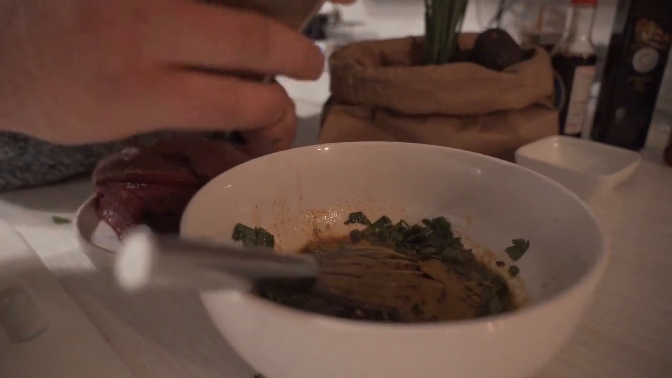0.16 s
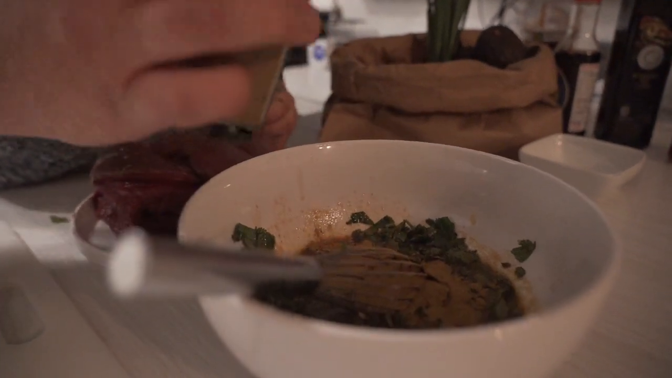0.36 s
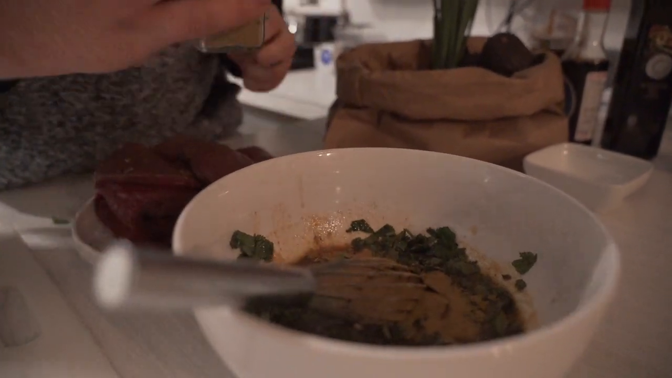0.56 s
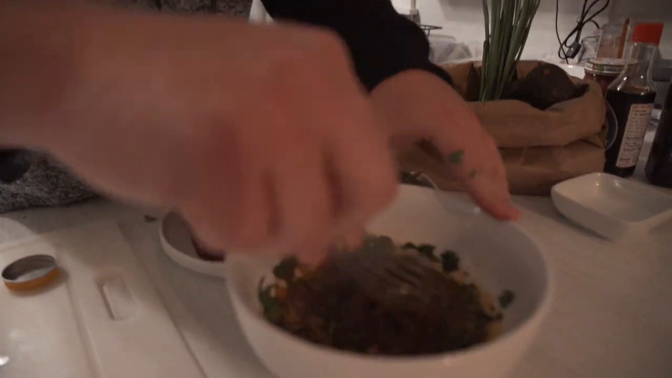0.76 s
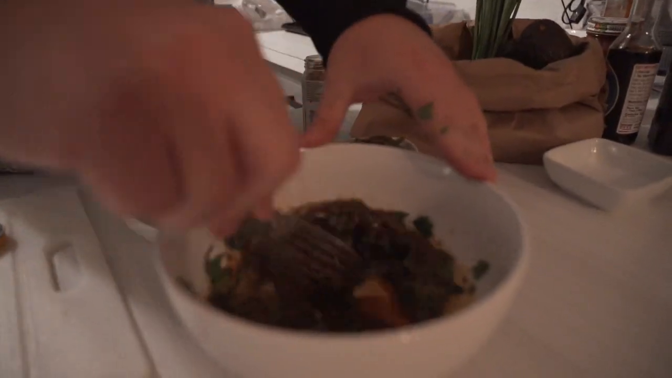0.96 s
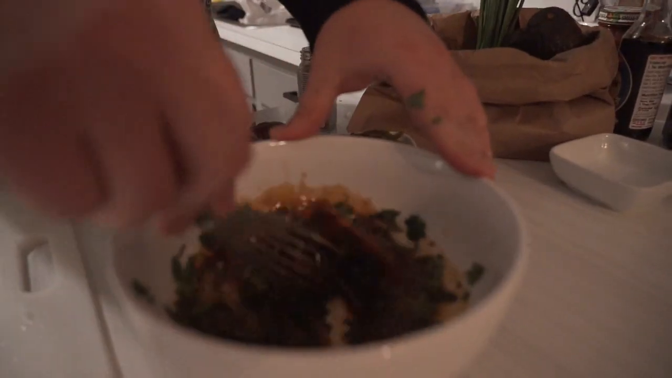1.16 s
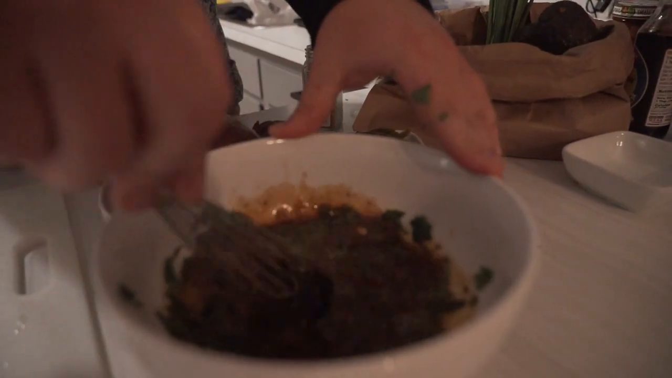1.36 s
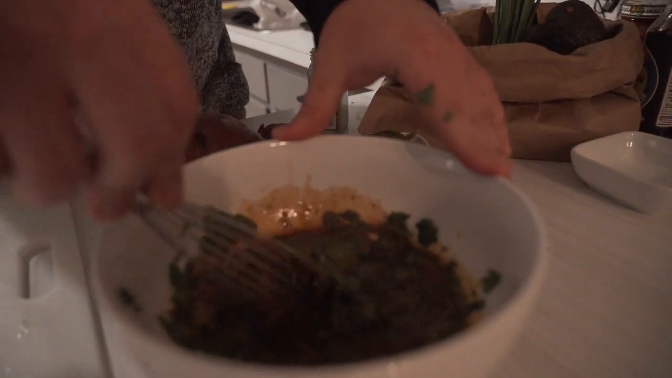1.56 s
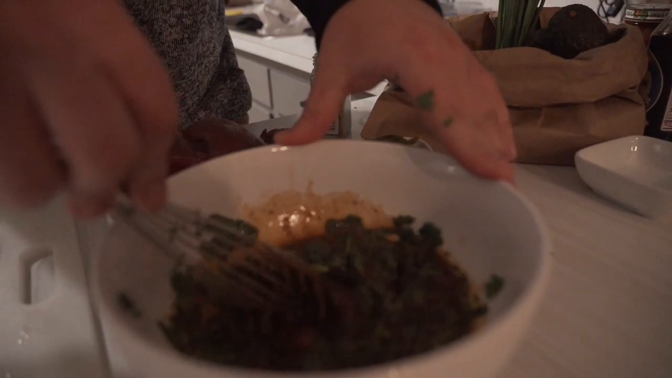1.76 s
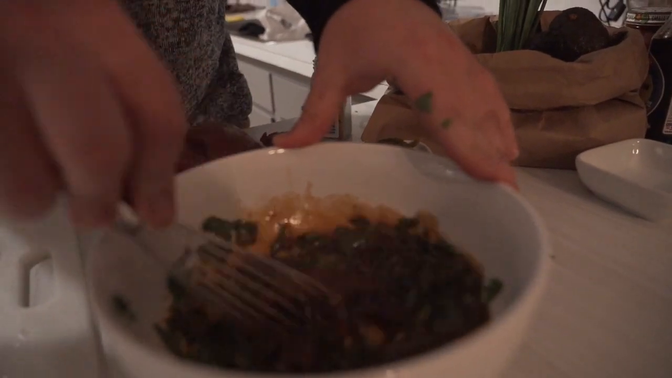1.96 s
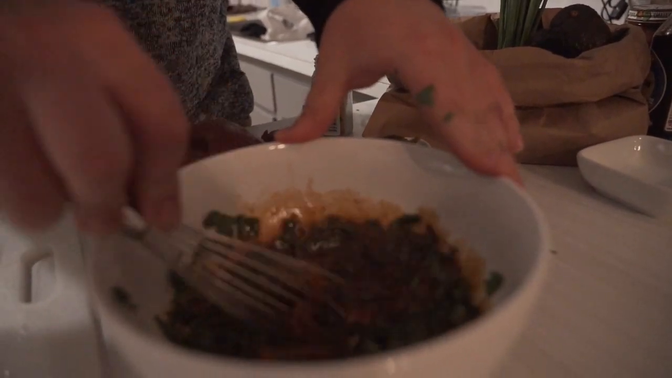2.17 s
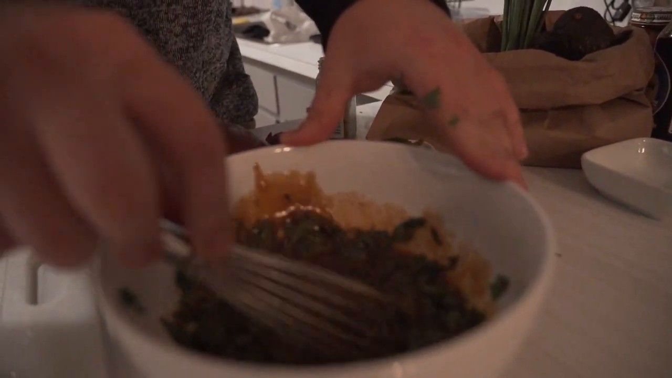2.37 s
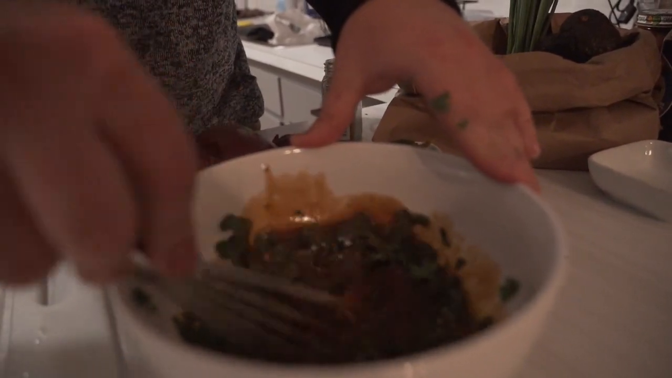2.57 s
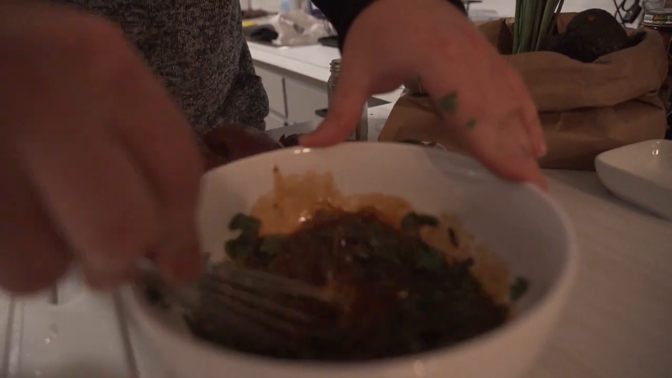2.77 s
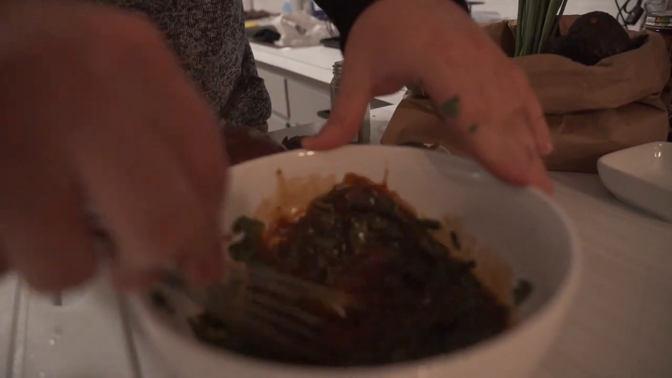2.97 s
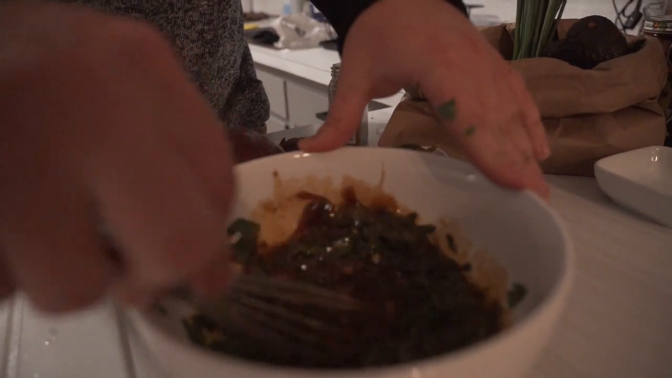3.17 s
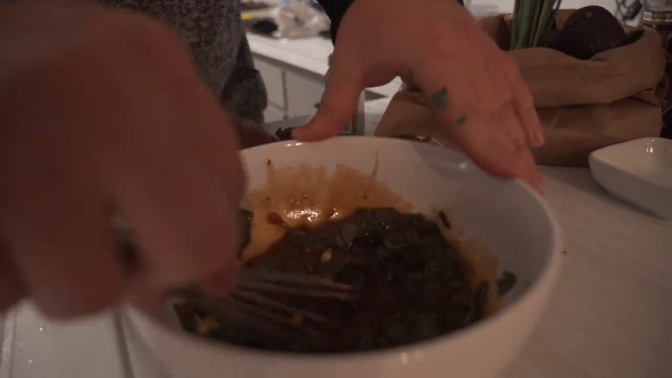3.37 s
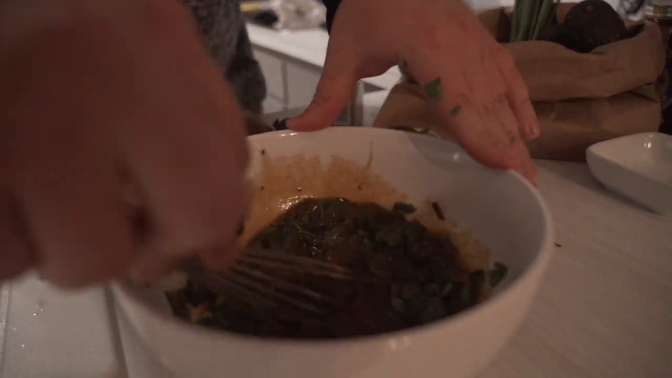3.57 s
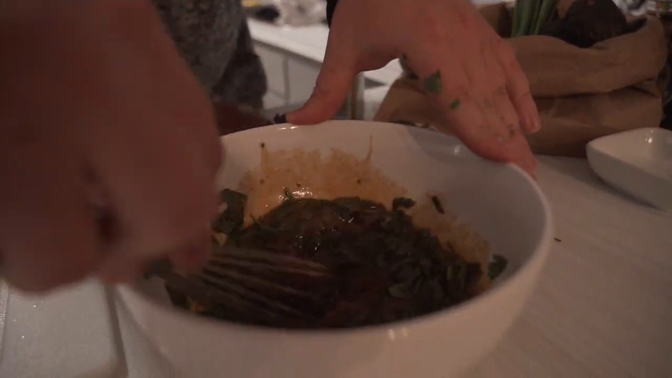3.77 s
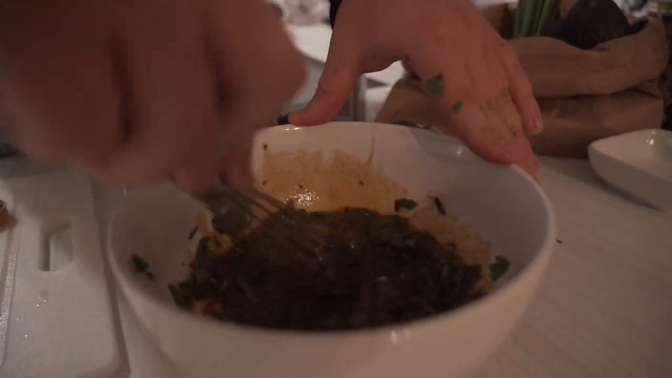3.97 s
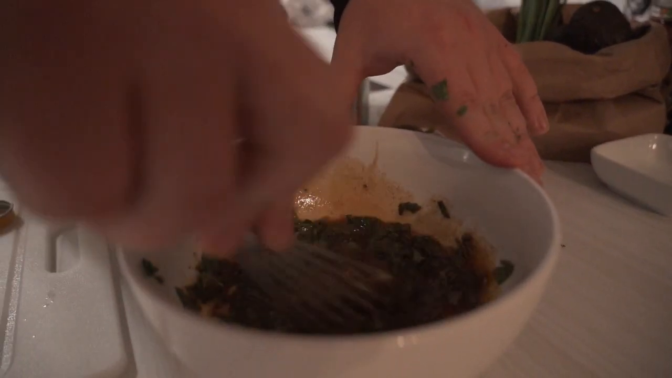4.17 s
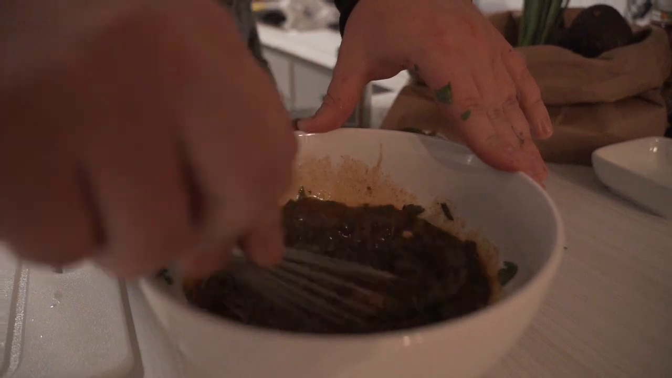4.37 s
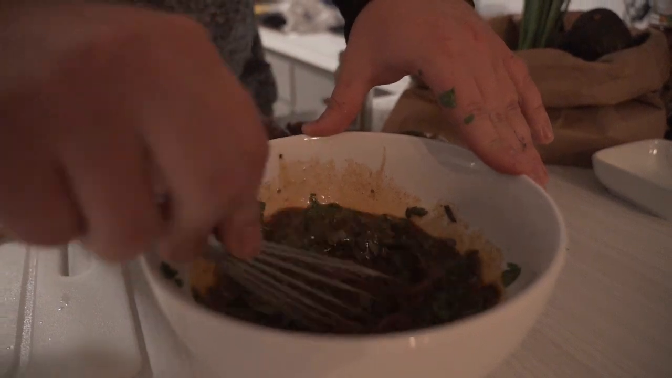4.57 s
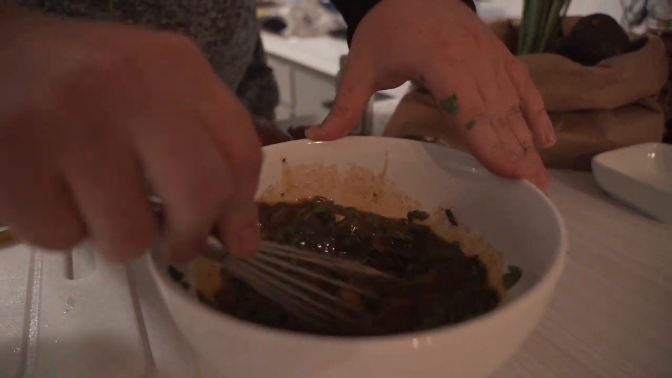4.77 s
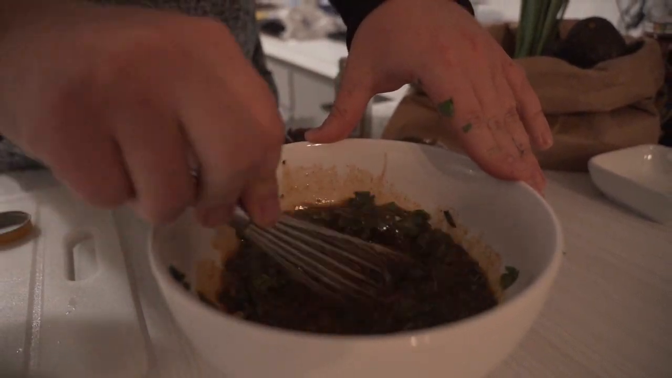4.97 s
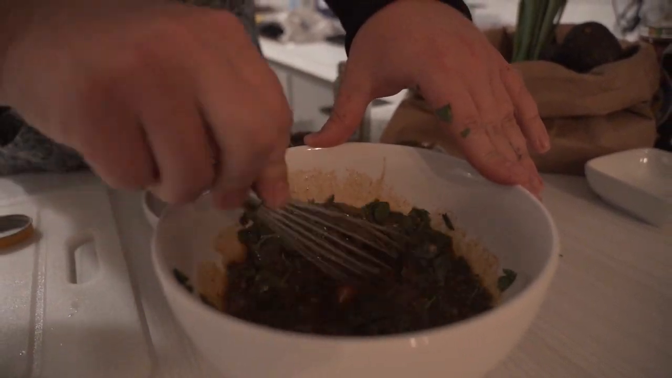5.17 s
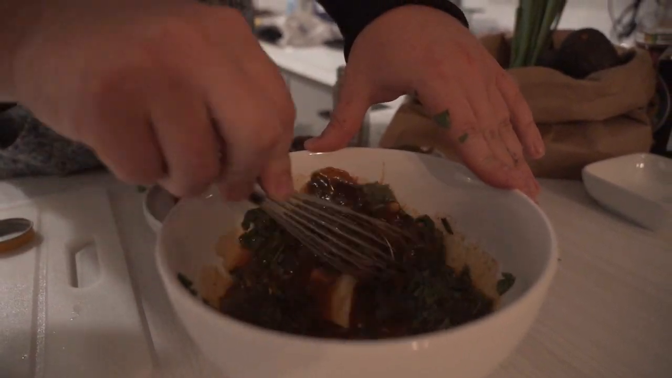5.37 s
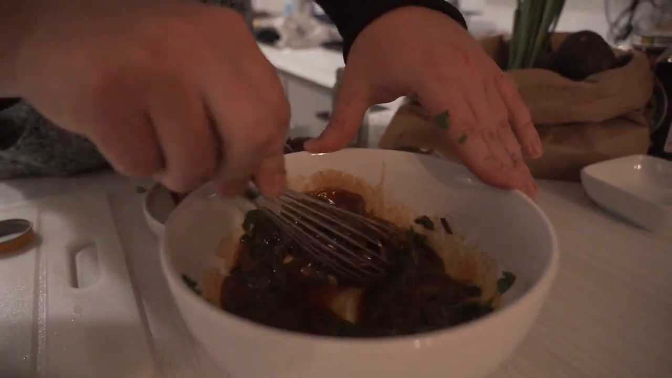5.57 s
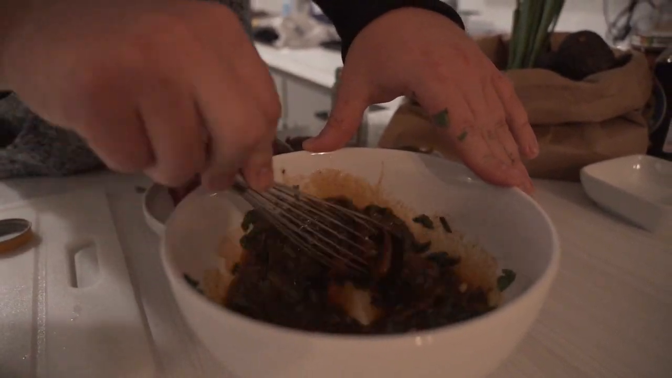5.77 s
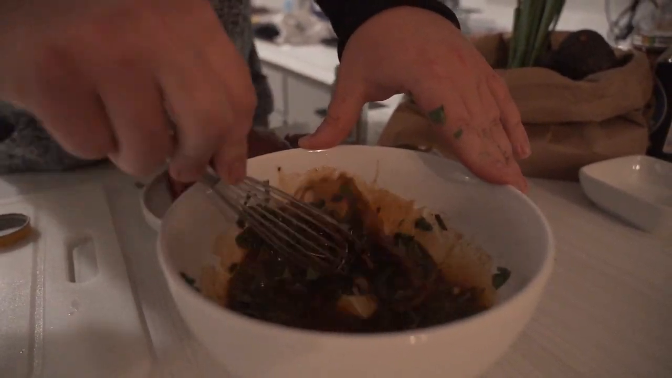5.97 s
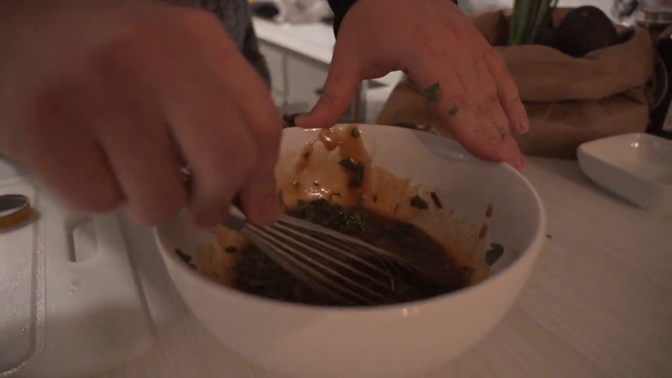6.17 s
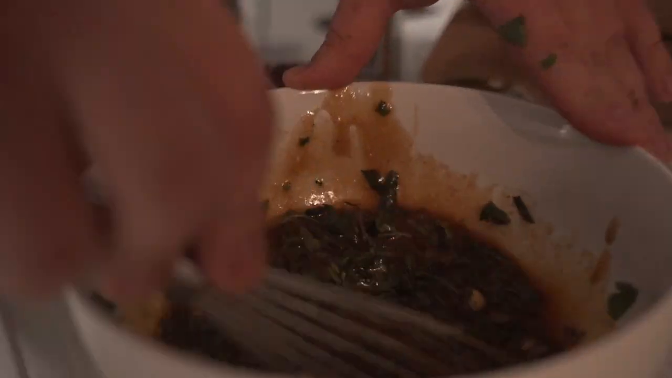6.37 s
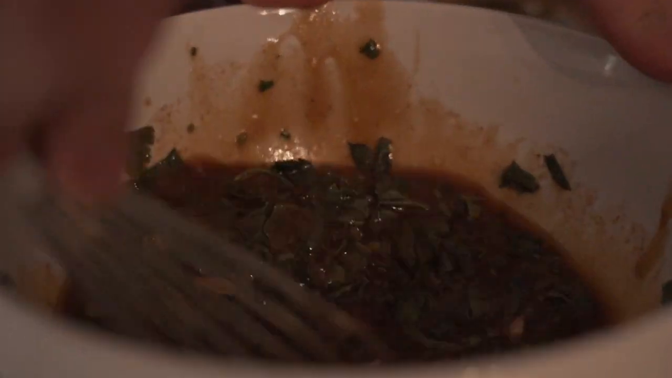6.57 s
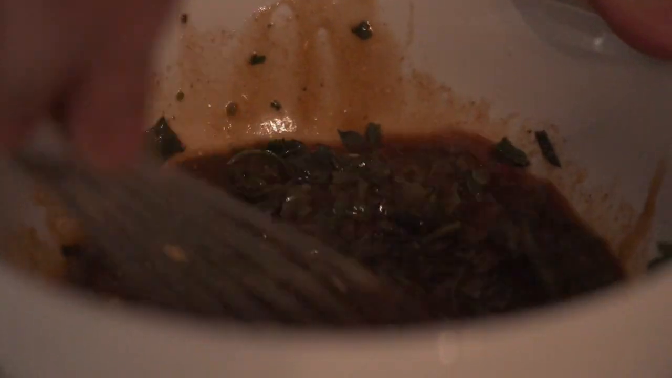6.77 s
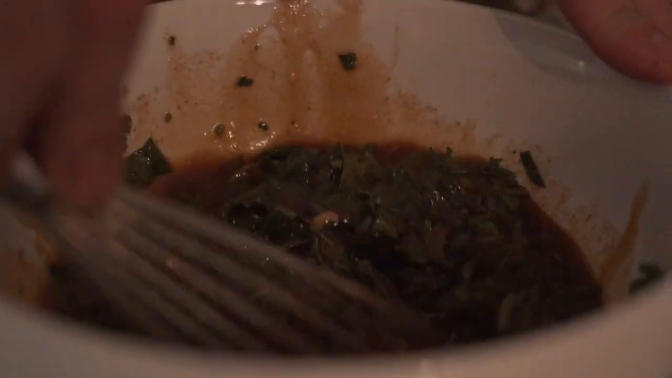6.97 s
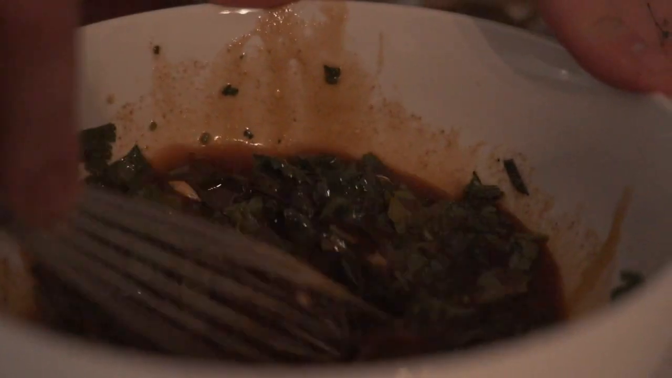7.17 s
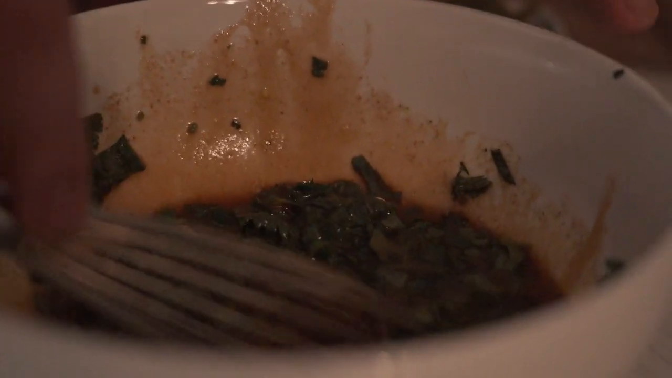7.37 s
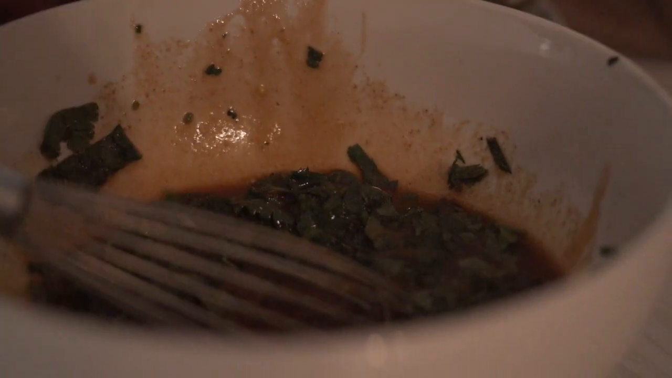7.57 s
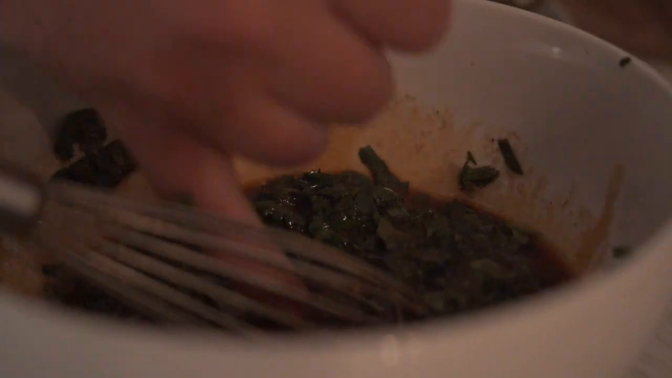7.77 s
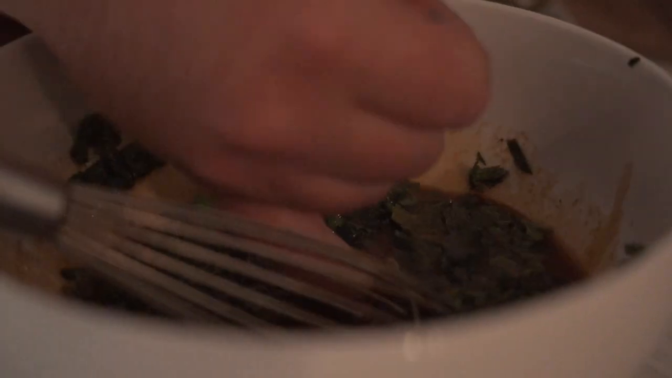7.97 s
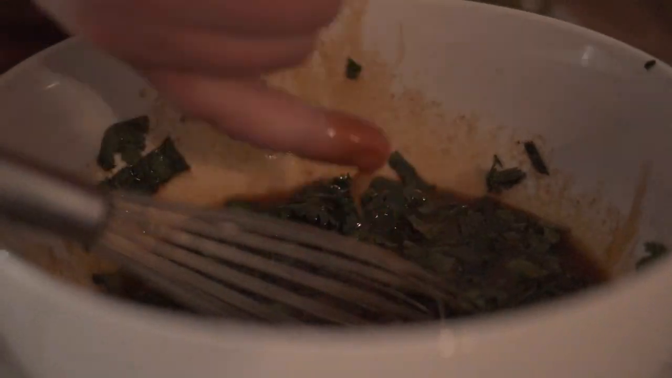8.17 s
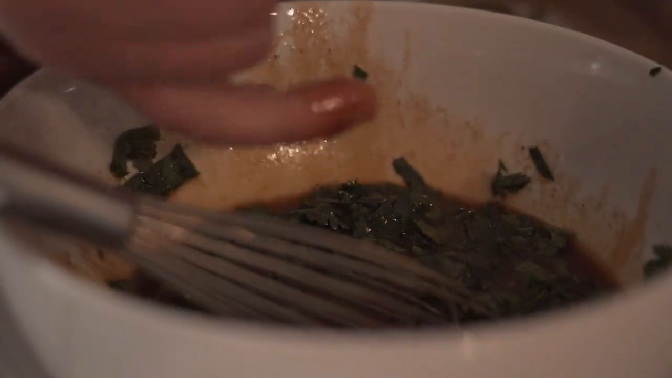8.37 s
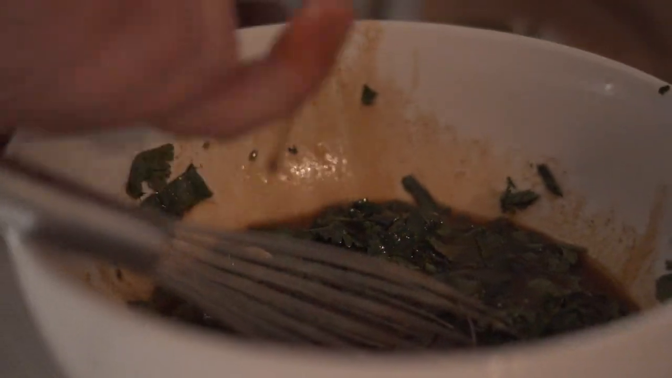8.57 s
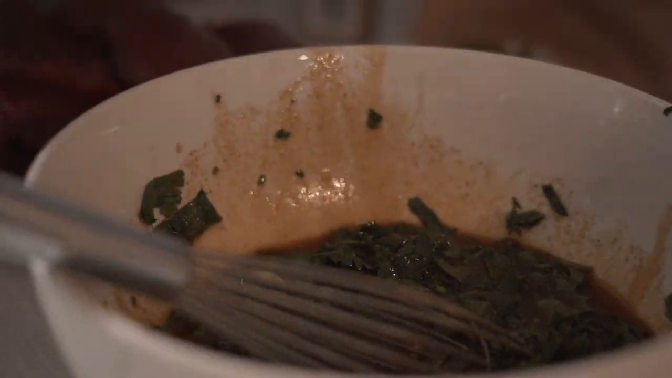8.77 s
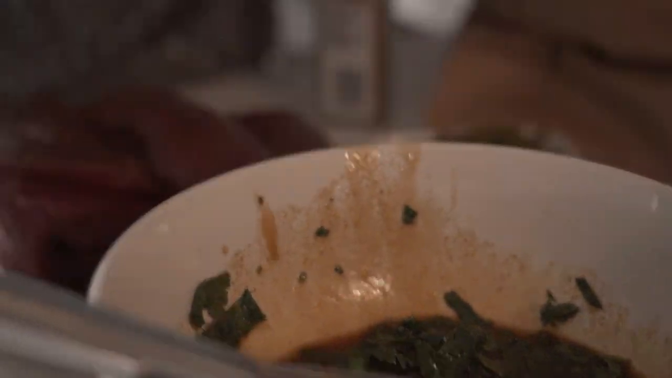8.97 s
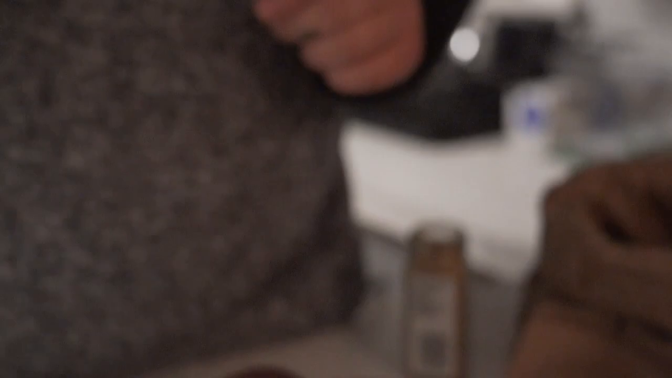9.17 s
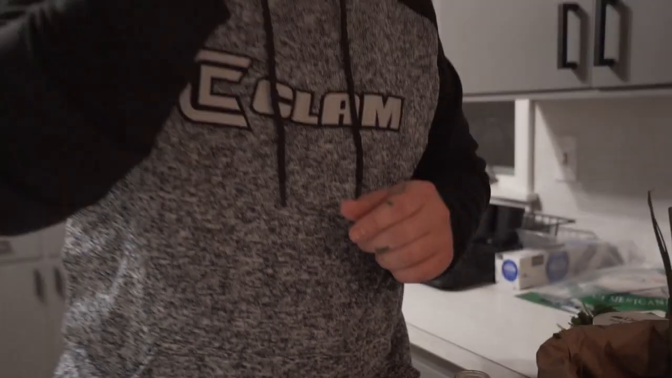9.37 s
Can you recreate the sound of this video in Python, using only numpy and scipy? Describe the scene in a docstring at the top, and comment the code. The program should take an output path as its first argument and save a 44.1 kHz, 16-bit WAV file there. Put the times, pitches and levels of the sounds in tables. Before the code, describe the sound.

Close to a ceramic bowl in a small, mildly reverberant kitchen, a whisk works through thick sauce in quick uneven strokes. Low rubbing comes with the early strokes, then sticky squelches, tiny pops and rhythmic dull bowl knocks. A few hard, bright clinks stand out. Stirring thins after six seconds, ends with a clink, and leaves quiet room tone with soft shuffles and taps.

```python
"""On a kitchen counter, close to a ceramic bowl, a wire whisk stirs a thick herb marinade.
Bursts of filtered clicks make the wet swish of each stroke; resonators excited by uneven slips make its rub.
Air pockets pop as rising tones, wire films snap, slow bubbles swell; decaying modes make the bowl's thuds
and the clinks of the steel handle. Diffuse kitchen echo surrounds them.
A motor hum of a few harmonics and coloured noise lie underneath, louder at first."""
import sys
import numpy as np
from scipy import signal
from scipy.fft import rfft, irfft, next_fast_len
from scipy.io import wavfile
from scipy.ndimage import uniform_filter1d

SR = 44100
rng = np.random.default_rng(int(sys.argv[2]) if len(sys.argv) > 2 else 0)


def dump_mix(stems):
    """Bounce the given channels to the path in sys.argv[1] as a 16-bit WAV at rate SR."""
    frames = np.atleast_2d(stems).T  # one column per channel
    limited = np.clip(frames, -1, 1)  # hard clip at full scale
    pcm = np.round(limited * 32767).astype(np.int16)
    wavfile.write(sys.argv[1], SR, pcm)


N = 415863
T = np.arange(N) / SR


def from_db(db):
    """Decibels to gain."""
    return 10 ** (np.asarray(db) / 20)


def rms_one(x):
    """Scale to rms 1."""
    return x / np.sqrt(np.mean(x ** 2) + 1e-20)


def at_hz(points, hz, column=1):
    """Read a column of a spectrum on a log-frequency axis."""
    points = np.array(points)
    return np.interp(np.log(hz + 1e-9), np.log(points[:, 0]), points[:, column])


def coloured(x, spectrum):
    """Give x a spectrum; rms 1."""
    size = next_fast_len(N)
    gain = from_db(at_hz(spectrum, np.arange(size // 2 + 1) * SR / size))
    return rms_one(irfft(rfft(x, size) * gain, size)[:N])


def band(x, low_hz, high_hz):
    """Butterworth band-pass."""
    edges = [low_hz, min(high_hz, .45 * SR)]
    return signal.sosfilt(signal.butter(2, edges, "band", fs=SR, output="sos"), x + 1e-18)


def resonance(x, hz, width_hz):
    """Two-pole resonance with gain 1 on top."""
    r = np.exp(-np.pi * width_hz / SR)
    zeros = np.array([1, 0, -1]) * (1 - r * r) / 2
    poles = [1, -2 * r * np.cos(2 * np.pi * hz / SR), r * r]
    return signal.lfilter(zeros, poles, x + 1e-18)


def mode(hz, db, t60):
    """Half a second of a struck mode, a sine that dies exponentially."""
    t = T[:SR // 2]
    return from_db(db - 60 * t / t60) * np.sin(2 * np.pi * hz * t)


def burst(db, low_hz, high_hz, t60):
    """A short spray of countless quickly damped modes, as dying band noise."""
    t = T[:SR // 2]
    return from_db(db - 60 * t / t60) * rms_one(band(rng.standard_normal(len(t)), low_hz, high_hz))


def add(out, s, sound):
    """Mix a sound in at time s."""
    i = max(int(s * SR), 0)
    out[i:i + len(sound)] += sound[:max(N - i, 0)]


def drift(rate):
    """Smooth random wandering, rate turns a second, rms 1."""
    count = 2000
    knots = rng.standard_normal(count)
    return rms_one(np.interp(T * rate, np.arange(count), knots))


def swells(rows, edge_db, rise_share):
    """Gain that climbs to each crest and sinks again, edge_db down at both ends."""
    gain = np.zeros(N)
    for crest, length, db in rows:
        near = np.abs(T - crest) < 1.5 * length
        before = (crest - T[near]) / rise_share
        after = (T[near] - crest) / (1 - rise_share)
        away = np.maximum(before, after) / length
        gain[near] = np.hypot(gain[near], from_db(db - edge_db * away ** 1.53))
    return gain


def spell(start, end, ramp_s=0.01):
    """Gain 1 between two times, with short ramps."""
    return np.clip(np.minimum(T - start, end - T) / ramp_s + .5, 0, 1)


# motor hum: multiple of HUM_HZ, level_db [relative]
HUM_HARMONICS = [(1, 1.5), (2, -14), (3, -11), (4, -16.5)]
HUM_HZ = 57.7
HUM_DB, LOUD_HUM_DB, LOUD_HUM_END_S = -69.5, -54, 0.747  # the hum starts louder, then drops
# low murmur of the room: pitch_hz, level_db [relative, per Hz]
RUMBLE_SPECTRUM = [(20, -9.5), (45, -9), (90, -12.5), (200, -8), (330, -15.5), (470, -14.5), (700, -24),
                   (1300, -29), (2500, -48.5)]
# soft shuffling near the bowl: crest_s, length_s, level_db [rms at the crest]
SHUFFLES = [(6.02, 0.11, -61), (6.33, 0.25, -56.5), (9.2, 0.31, -62), (9.4, 0.26, -61)]
# colour of the shuffling: pitch_hz, level_db [relative, per Hz]
SHUFFLE_SPECTRUM = [(25, -3.5), (80, -3.5), (250, -9), (550, -20), (1100, -27.5), (4000, -29.5),
                    (9000, -51.5)]
# colour of the hiss: pitch_hz, level_db [relative, per Hz]
HISS_SPECTRUM = [(150, -8), (500, -2.5), (900, -0.5), (1200, -2), (2200, 2.2), (2850, -3), (3600, 2.5),
                 (4200, 3), (4600, -5), (5800, -14.5), (9000, -23), (16000, -25)]
# spells of louder hiss: start_s, end_s, level_db [rms at the middle]
HISS_SPELLS = [(-.1, 0.727, -64.5), (6.252, 7.699, -75.5)]
HISS_DB, HISS_SAG_DB_PER_S = -83, 6  # steady level; each spell sinks slowly


def background(rumble_db=-70, loud_rumble_db=-62, air_db=-90):
    """Around the bowl: hum as summed harmonics; murmur, shuffling, hiss and thin air as noise."""
    white = rng.standard_normal((4, N))
    early = spell(-1, LOUD_HUM_END_S)
    hum = 0
    for k, db in HUM_HARMONICS:
        hum = hum + from_db(db) * np.sin(2 * np.pi * (round(k) * HUM_HZ * T + rng.random()))
    hum = rms_one(hum) * from_db(HUM_DB + early * (LOUD_HUM_DB - HUM_DB))
    rumble_level = from_db(rumble_db + early * (loud_rumble_db - rumble_db))
    rumble = rumble_level * coloured(white[0], RUMBLE_SPECTRUM)
    shuffle = swells(SHUFFLES, edge_db=12.5, rise_share=0.38) * coloured(white[1], SHUFFLE_SPECTRUM)
    louder = 0
    for start, end, db in HISS_SPELLS:
        sag_db = HISS_SAG_DB_PER_S * (T - (start + end) / 2)
        louder = louder + spell(start, end) * from_db(db - sag_db)
    hiss = np.hypot(from_db(HISS_DB), louder) * coloured(white[2], HISS_SPECTRUM)
    return hum + rumble + shuffle + hiss + from_db(air_db) * white[3]


def grains(per_s, spread_db):
    """Random clicks, many small and a few large."""
    size = from_db(spread_db * np.minimum(rng.exponential(1, N), 4.5))
    return (rng.random(N) < per_s / SR) * size * rng.choice([-1, 1], N)


# colour of the wet crackle: pitch_hz, level_db [relative, per Hz]
WET_SPECTRUM = [(750, -5), (1000, -10), (1450, -4), (2400, -6.5), (3600, -2.5), (4600, -9.5), (5700, -14.5),
                (7200, -11.5), (10000, -20), (15500, -22.5)]


def wet_crackle(per_s, spread_db, cycles, patchy_db):
    """Tiny bubbles and tearing films; cavities open and close between the leaves, so each pitch comes and goes."""
    clicks = grains(per_s, spread_db)
    pitches = np.geomspace(750, 15000, 36)
    dealt = rng.choice(len(pitches), N, p=pitches / pitches.sum())  # small bubbles are the common ones
    out = 0
    for k, hz in enumerate(pitches):
        bubbles = rms_one(resonance(clicks * (dealt == k), hz, hz / cycles))
        patches_db = patchy_db * np.clip(drift(rate=55), -2, 1.7)
        out = out + from_db(at_hz(WET_SPECTRUM, hz) + patches_db) * np.sqrt(hz) * bubbles
    return rms_one(out)


def blip(hz, length, rise):
    """An opening air pocket swells and fades while its pitch climbs; its ragged rim makes the tone rough."""
    age = T[:SR // 20] / (0.77 * length)  # 1 at the peak, where the pitch is hz
    pitch = hz * (1 + 2 * rise * np.tanh((age - 1) / 2))
    ragged = 1 + .25 * rms_one(uniform_filter1d(rng.standard_normal(len(age)), size=36))
    return (age * np.exp(1 - age)) ** 3 * ragged * np.sin(2 * np.pi * np.cumsum(pitch) / SR)


def squelch(wetness, per_s=170, level_db=0.5, centre_hz=2600):
    """Small air pockets of every size open wherever the sauce is disturbed."""
    out = np.zeros(N)
    times = np.cumsum(rng.exponential(1, size=2500)) / per_s
    times = times[times < T[-1]]
    chances = np.clip(rng.standard_normal((len(times), 4)), -1.8, 1.8)
    for s, (size, loud, slow, glide) in zip(times, chances):
        strength = wetness[int(s * SR)] * from_db(level_db + 1.7 * loud)
        length = .0022 * np.exp(.3 * size + .35 * slow)
        rise = .02 + .05 * glide
        add(out, s, strength * blip(centre_hz * np.exp(-.5 * size), length, rise))
    return out


# how stirred up the sauce is: time_s, level_db [before the mix of the crackle]
SEEP = [(.72, -86), (.9, -73.5), (1.25, -72.5), (2.2, -65.5), (2.6, -67.5), (3.75, -60.5), (4.17, -78.5),
        (4.6, -64), (5.85, -66), (6.2, -77), (7.1, -73.5), (7.5, -92.5)]
# strokes of the whisk: crest_s, length_s, swish_db [through the leaves], rub_db [on the wall]
STROKES = [(.885, .05, -61.5, -52.5), (1.015, 0.033, -57, -63), (1.378, .125, -54.5, -41),
           (1.582, 0.085, -54, -46.5), (1.765, 0.15, -60.5, -71), (1.821, 0.088, -61, -45),
           (1.894, 0.028, -57, -64), (2.002, .08, -54, -66), (2.053, 0.072, -47, -43),
           (2.13, 0.075, -59.5, -59), (2.68, 0.064, -60, -53.5), (2.9, 0.23, -61.5, -77),
           (3.1, 0.17, -61.5, -60), (3.295, 0.15, -54, -54.5), (3.41, 0.12, -56, -52.5),
           (3.515, 0.19, -57, -57.5), (3.69, 0.22, -52.5, -52), (3.875, 0.16, -52, -47),
           (4.11, 0.034, -60.5, -76), (4.335, 0.087, -59.5, -65), (4.495, 0.13, -52, -45),
           (4.725, 0.17, -59, -53), (5.118, 0.08, -51, -48.5), (5.305, 0.049, -49, -78),
           (5.735, 0.038, -64, -74), (5.825, 0.1, -53, -71), (6.705, .09, -63, -71)]
STROKE_RISE_SHARE, STROKE_EDGE_DB = 0.53, 18.5  # part of a stroke before its crest; how far down its ends lie


def stirred_db(s):
    """Level of the stirred-up sauce at time s, read between the listed points."""
    return np.interp(s, *np.transpose(SEEP))


def sauce(churn_db=0.0, flutter_db=5.0, spatter_db=-9):
    """Dense crackle under each sweep, sparse as the sauce settles, with squelches, spatter and a low thick churn."""
    sweep = swells([row[:3] for row in STROKES], STROKE_EDGE_DB, STROKE_RISE_SHARE)
    seep = from_db(stirred_db(T))
    wetness = np.hypot(0.39 * sweep, seep)
    flutter = from_db(flutter_db * np.clip(drift(rate=100), -2, 1.5))  # wire after wire cuts through
    dense = sweep * flutter * wet_crackle(per_s=7600, spread_db=3.5, cycles=24, patchy_db=6.5)
    sparse = seep * wet_crackle(per_s=1100, spread_db=4.0, cycles=24, patchy_db=3.5)
    droplets = rms_one(band(grains(per_s=42, spread_db=5.0), 5500, 19000))  # single droplets land
    spatter = from_db(spatter_db) * wetness * droplets
    churn = from_db(churn_db) * seep * rms_one(band(rng.standard_normal(N), 70, 210))
    return from_db(-0.5) * (dense + sparse) + squelch(wetness) + spatter + churn


STIR_START_S, STIR_END_S = .8, 7.15  # smaller pops and snaps come at random while the whisk is in the sauce
STRAY_FOLLOWS = 0.35  # share of the sauce's swing in dB that they follow


def strays(per_s, db, centre_hz, spread_db, octaves):
    """Rows (s, dB, Hz) of small chance events, louder where the sauce is more stirred up."""
    count = 200
    when, loud, size = rng.uniform(-1, 1, (count, 3)).T
    s = STIR_START_S + (np.arange(count) + 1 + when) / per_s
    below_top_db = stirred_db(s) - np.max(np.array(SEEP)[:, 1])
    levels_db = db + STRAY_FOLLOWS * below_top_db + spread_db * loud
    rows = np.transpose([s, levels_db, centre_hz * 2 ** (octaves * size)])
    return list(rows[s < STIR_END_S])


# the largest air pockets open in the sauce: time_s, level_db [before level_db of pops], pitch_hz
POPS = [(0.623, -44, 3100), (1.008, -40, 1620), (1.013, -39, 1870), (1.025, -33, 1536),
        (1.202, -39.5, 1740), (1.236, -40.5, 3600), (1.561, -43.5, 1830), (1.831, -40, 1550),
        (2.289, -38.5, 1940), (2.301, -33, 1830), (2.433, -44.5, 2820), (3.535, -37, 1430),
        (4.329, -39, 1770), (4.471, -39.5, 3800), (5.202, -43, 1550), (5.377, -33.5, 1720),
        (5.725, -45, 3850), (5.858, -38.5, 1480), (5.908, -41, 2360), (6.047, -42.5, 1700),
        (6.498, -50, 3040), (6.698, -51, 3200), (7.772, -52.5, 1310)]
POP_S = 0.0028  # typical length; the peak comes at 0.77 of it


def pops(level_db=-4.5, rise=.11, tear_db=-13, length_spread=.3):
    """The larger air pockets tear open: a rising tone with a tiny crack of noise."""
    out = np.zeros(N)
    small = strays(per_s=7.1, db=-49.5, centre_hz=2555, spread_db=6, octaves=0.58)
    for s, db, hz in list(POPS) + small:
        length = POP_S * np.exp(length_spread * rng.uniform(-1.1, 1))
        add(out, s - 0.85 * length, from_db(db + level_db) * blip(hz, length, rise))
        add(out, s - 0.35 * length, burst(db + tear_db, low_hz=1213, high_hz=7000, t60=0.016))
    return out


# resonances of the wire loops: pitch_hz, width_hz, level_db [relative]
WIRES = [(112, 57, 1.5), (166, 43, 0.5), (390, 68, -18), (731, 55, -5.5), (1006, 200, -16), (1403, 80, -13),
         (1870, 93, -31), (2724, 90, -18.5)]
RUB_SHARE, RUB_LAG_S = 0.47, .005  # part of a stroke spent against the wall, centred just after the crest


def rubs(slips_per_s=900, edge_s=0.015, flex=0.076, slide=.06, level_db=-3.5):
    """Uneven slips on the glaze ring the wire loops; they bend anew each stroke and their pitch slides."""
    out = np.zeros(N)
    slips = grains(slips_per_s, spread_db=3.5)
    bent = np.cumsum(slide * drift(rate=35))  # samples by which the ringing runs ahead
    bends = rng.standard_normal((len(STROKES), len(WIRES)))
    for (crest, length, _, db), bend in zip(STROKES, bends):
        start, end = crest + RUB_LAG_S + RUB_SHARE * length * np.array([-.5, .5])
        near = (T > start - .05) & (T < end + .05)
        steps = np.arange(near.sum())
        pressure = np.clip(np.minimum(T[near] - start, end - T[near]) / edge_s + .3, 0, 1)
        for (hz, width, mode_db), b in zip(WIRES, bend):
            hz = hz * (1 + flex * b)
            ring = slips[near]
            for _ in range(2):  # two passes at 1.55 times the width give about the listed width
                ring = resonance(ring, hz, 1.55 * width)
            ring = np.interp(steps + bent[near] - bent[near][0], steps, ring)
            even = ring / np.sqrt(uniform_filter1d(ring ** 2, size=1100) + 1e-18)
            out[near] += from_db(db + mode_db + level_db) * pressure * even
    return out


# the loudest films snap between the wires: time_s, level_db [before ring and spray levels], pitch_hz
SNAPS = [(1.007, -48, 8100), (1.416, -41, 6560), (1.891, -45, 5700), (1.983, -41, 5460),
         (2.045, -33.5, 5700), (2.056, -39, 5540), (3.546, -34.5, 7900), (4.376, -45.5, 9200),
         (5.816, -44, 7300), (7.829, -60, 14300)]


def snaps(ring_db=7, ring_cycles=24, spray_db=-7, build_s=0.00031):
    """Films snap between the wires, ring for a few cycles and throw a fine spray."""
    out = np.zeros(N)
    small = strays(per_s=7, db=-49.5, centre_hz=8150, spread_db=6.5, octaves=.6)
    for s, db, hz in list(SNAPS) + small:
        ring = mode(hz, ring_db, ring_cycles / hz)
        snap = ring + burst(spray_db, low_hz=5000, high_hz=16000, t60=0.022)
        add(out, s, from_db(db) * snap * (1 - np.exp(-T[:len(snap)] / build_s)))
    return out


# the bowl rocks on the counter: time_s, level_db [before level_db of knocks]
KNOCKS = [(2.083, -33), (2.303, -40.5), (2.784, -32.5), (2.983, -33.5), (3.175, -37), (3.371, -41.5),
          (3.589, -35), (3.779, -40), (4.323, -47), (4.727, -38.5), (4.828, -34.5), (4.938, -40),
          (5.153, -39), (5.380, -33.5), (5.579, -36), (5.796, -38), (7.216, -37)]
# bowl and counter together: pitch_hz, level_db [relative], t60_s; each knock varies all three
COUNTER_MODES = [(139, -16, 0.07), (185.7, -7, 0.067), (251, -3, 0.11), (303.4, -5.5, 0.14),
                 (407, -3, 0.057), (738, -7.5, 0.029), (1210, -8.5, 0.011)]


def knocks(level_db=-2.5, vary_db=3.0, detune=0.02):
    """The bowl's foot drops back on the counter with a dull thud; grip and sauce shift its pitch and damping."""
    out = np.zeros(N)
    chances = rng.standard_normal((len(KNOCKS), len(COUNTER_MODES), 2))
    for (s, db), chance in zip(KNOCKS, chances):
        grip = rng.uniform(-1, 1)
        pitch, damping = 1 + .02 * grip, np.exp(.3 * grip)
        thud = burst(db=-9.5, low_hz=450, high_hz=1060, t60=.025)
        for (hz, mode_db, t60), (loud, shift) in zip(COUNTER_MODES, chance):
            thud = thud + mode(hz * (pitch + detune * shift), mode_db + vary_db * loud, t60 / damping)
        add(out, s, from_db(db + level_db) * thud)
    return out


# slow bubbles in the thick sauce: time_s, level_db [peak, about], pitch_hz [at the peak]
BLOOPS = [(2.469, -55.5, 1400), (5.545, -49, 1420), (7.08, -54.5, 2065)]
BLOOP_S, BLOOP_RISE = .009, .2  # length, peak at 0.77 of it; slope of the pitch there, share per rise time


def bloops():
    """Slow bubbles swell into soft rising notes, much slower than the pops."""
    out = np.zeros(N)
    for s, db, hz in BLOOPS:
        add(out, s - BLOOP_S, from_db(db) * blip(hz, BLOOP_S, BLOOP_RISE))
    return out


# steel handle on the bowl: time_s, level_db [scales all modes], height [wall -1 to rim 1]
CLINKS = [(2.7585, -18.5, 0.19), (4.8263, -13, -0.63), (4.8505, -21.5, -0.44), (7.2168, -13, 0.97),
          (7.771, -57.5, -.8)]
# ring of the bowl: pitch_hz, level_db [relative], t60_s, rim_db [extra when struck at the rim]
BOWL_MODES = [(1420, -23, 0.07, 0), (1990, -28.5, 0.13, 1), (3390, -19, 0.12, 2.5),
              (3527, -17.5, 0.18, 2.8), (3550, -15.5, 0.08, -1.5), (4034, -24, 0.067, -0.5),
              (5190, -33.5, 0.32, -2.5), (5095, -30.5, 0.14, -1), (7128, -21.5, 0.077, 7),
              (9210, -28.5, .035, 0.5), (9412, -35.5, 0.11, -5.5), (11915, -33, .09, -5.5),
              (14710, -40, .07, 2)]
# short crack of the contact: pitch_hz, level_db [relative], t60_s
CRACK_MODES = [(1516, -4.5, 0.014), (2064, -3.5, 0.013), (2678, -4, 0.012), (3462, 4.5, 0.017),
               (5040, 0, 0.0088), (6200, -15, 0.0075), (11150, -24, 0.0081)]


def clinks(build_s=0.0019, spray_t60=0.057):
    """A crack, then the bowl's ring; the height of the contact decides which modes speak."""
    out = np.zeros(N)
    for s, db, height in CLINKS:
        ring = sum(mode(hz, mode_db + height * rim_db, t60) for hz, mode_db, t60, rim_db in BOWL_MODES)
        crack = sum(mode(hz, mode_db, t60) for hz, mode_db, t60 in CRACK_MODES)
        # the jolted whisk rattles
        wires = burst(db=-18 + 1.9 * height, low_hz=1270, high_hz=2918, t60=spray_t60)
        wires = wires + burst(db=-32.5, low_hz=5000, high_hz=15000, t60=0.044)
        build = 1 - np.exp(-T[:len(ring)] / build_s)
        add(out, s, from_db(db) * (ring + crack + wires) * build)
    return out


# light ticks of handling beside the bowl: time_s, level_db [rms of the noise before it dies away]
TICKS = [(9.213, -58), (9.298, -60), (9.391, -55.5)]


def ticks():
    """Dry little taps, each a short burst of band noise."""
    out = np.zeros(N)
    for s, db in TICKS:
        add(out, s, burst(db, low_hz=920, high_hz=4200, t60=0.022))
    return out


# kitchen echo: pitch_hz, t60_s, level_db [each band, against the direct sound]
KITCHEN_ECHO = [(100, 0.18, -6.5), (295.5, 0.84, -6.5), (714, 0.51, -6), (1800, 0.8, -17.5),
                (3600, 0.62, -11.5), (7040, 0.66, -20.5), (15000, .22, -16.5)]


def kitchen(x, first_echo_s=0.002):
    """Diffuse echo that dies band by band."""
    t = T[:SR * 3 // 4]
    edges = np.geomspace(70, 18000, 13)
    tail = 0
    for low, high in zip(edges, edges[1:]):
        hz = np.sqrt(low * high)
        decay = from_db(-60 * t / at_hz(KITCHEN_ECHO, hz))
        dying = rng.standard_normal(len(t)) * decay * (t > first_echo_s)
        level = from_db(at_hz(KITCHEN_ECHO, hz, column=2))
        tail = tail + level * band(dying / np.linalg.norm(dying), low, high)
    return signal.fftconvolve(x, tail)[:N]


def scene():
    """The bowl close by, the kitchen around it."""
    bowl = sauce() + pops() + rubs() + snaps() + knocks() + bloops() + clinks() + ticks()
    return (bowl + kitchen(bowl) + background())[None]


def record(dry, cutoff_hz=16000):
    """One microphone channel whose top is cut steeply by an elliptic low-pass."""
    return signal.sosfilt(signal.ellip(10, .1, 70, cutoff_hz, fs=SR, output="sos"), dry)


dry = scene()
out = record(dry)
dump_mix(out)
```